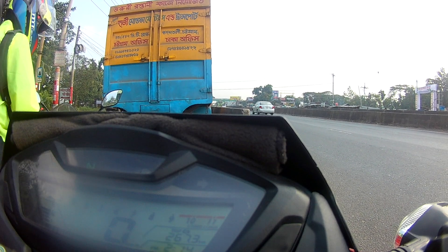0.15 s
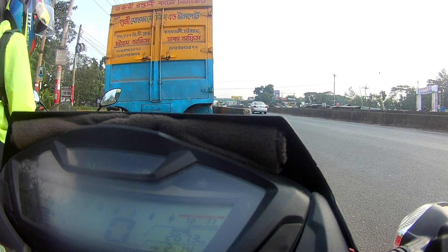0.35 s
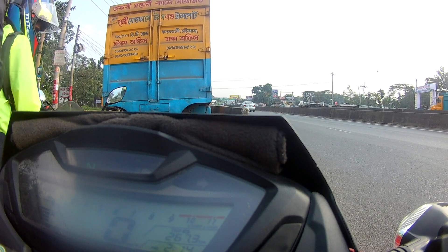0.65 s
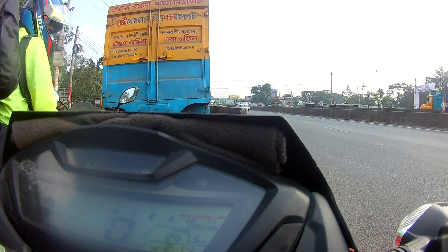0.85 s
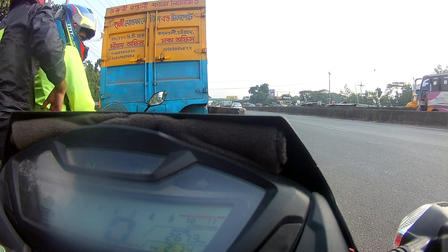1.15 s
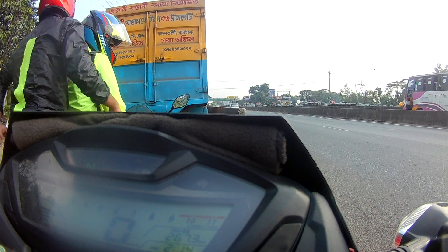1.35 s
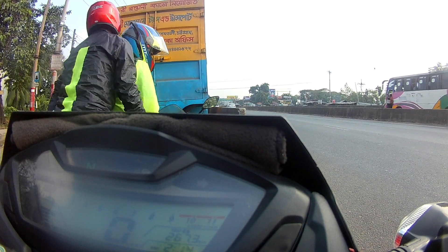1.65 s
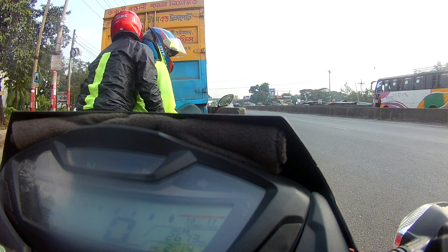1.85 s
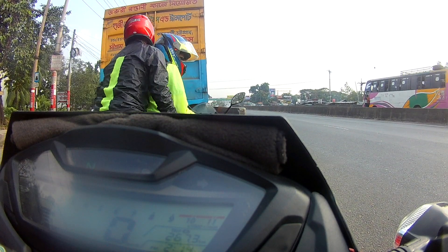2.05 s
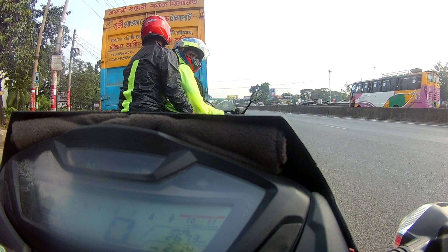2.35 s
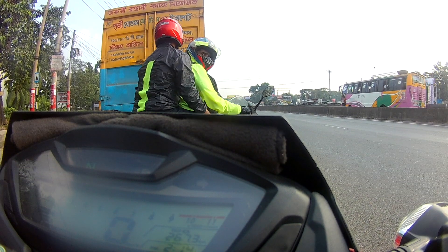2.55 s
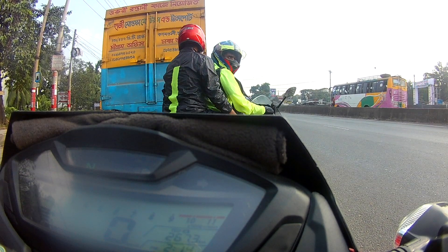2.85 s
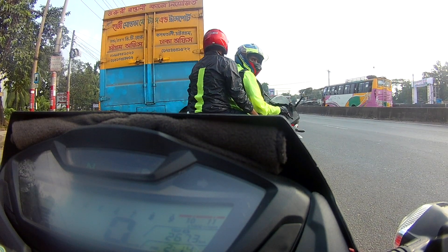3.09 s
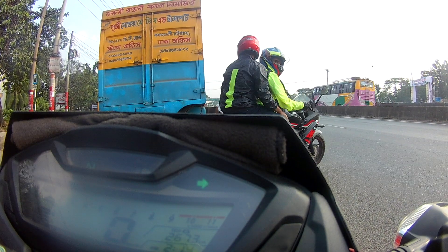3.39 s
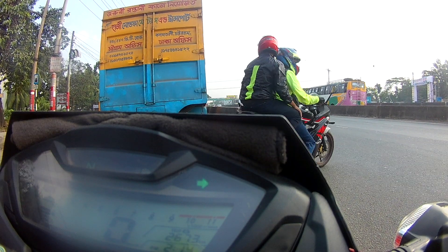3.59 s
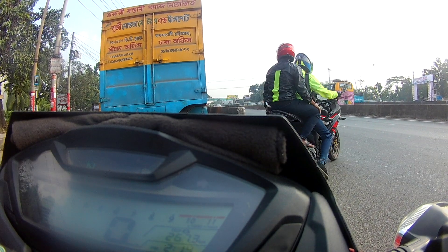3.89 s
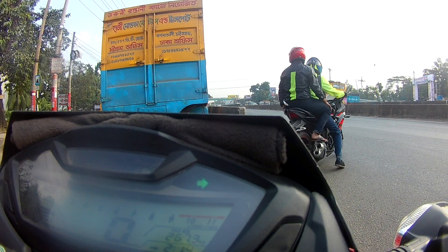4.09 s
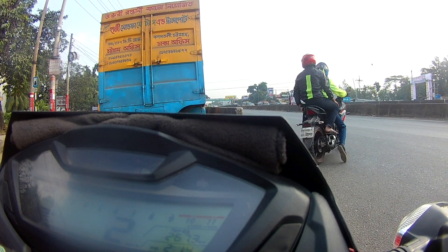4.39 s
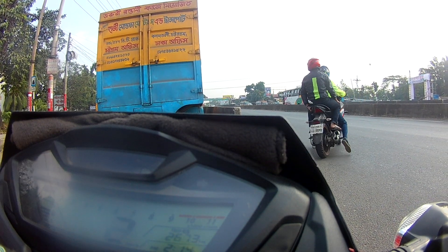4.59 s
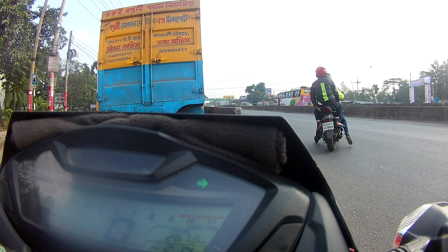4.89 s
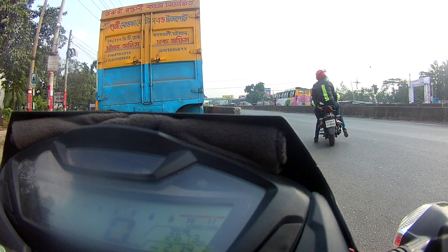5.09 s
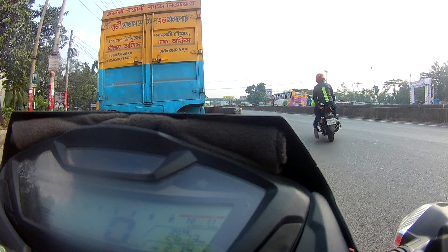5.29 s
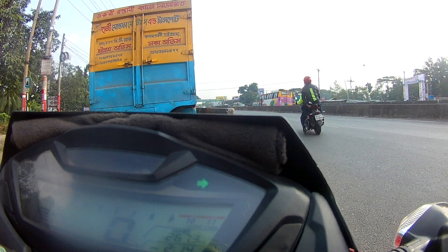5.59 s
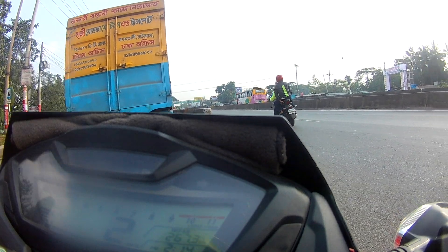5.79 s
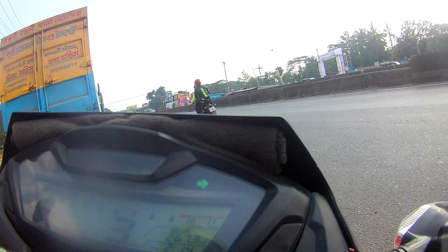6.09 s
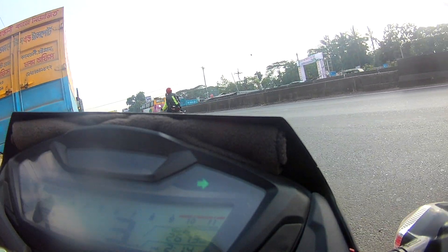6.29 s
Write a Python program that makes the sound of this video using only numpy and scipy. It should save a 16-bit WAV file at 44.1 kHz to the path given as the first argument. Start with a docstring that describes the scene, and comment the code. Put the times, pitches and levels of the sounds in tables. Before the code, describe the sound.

A microphone mounted on the motorcycle hears a clattery, puttering idle for about five seconds, with occasional harder piston slaps. Outdoors by a highway, steady traffic noise sits behind, with a deep passing drone at the start. Light control clicks precede a gear clunk; shortly after, the engine quickly speeds up, louder and firmer, with whining gears, low shaking and more air buffeting.

```python
"""A single-cylinder four-stroke motorcycle engine idles, first gear clunks in, then the revs climb and it pulls away.
One running cycle count places every knock, valve tick and exhaust puff; filters ring them through metal and pipe.
Under load the knocks close up to a growl, gear teeth whine as sine lines and a low shake fades in.
Behind it, filtered noise hums as highway traffic, a heavy vehicle drones by in harmonics and low air buffets."""
import sys
import numpy as np
from scipy import signal
from scipy.fft import rfft, irfft, next_fast_len
from scipy.io import wavfile
from scipy.ndimage import uniform_filter1d, map_coordinates

SR = 44100
rng = np.random.default_rng(int(sys.argv[2]) if len(sys.argv) > 2 else 0)


def write(x):
    x = np.atleast_2d(x).T
    wavfile.write(sys.argv[1], SR, np.round(np.clip(x, -1, 1) * 32767).astype(np.int16))


N = 284004

# engine speed: start_s [s], cycle_rate_hz [engine cycles per s]
ENGINE_SPEED = [(0.0, 10.45), (0.25, 11.08), (0.36, 10.76), (1.22, 10.91), (1.34, 11.51), (1.7, 10.93),
                (2.11, 11.22), (2.24, 10.65), (2.96, 11.24), (3.34, 10.63), (3.73, 11.22), (4.28, 10.42),
                (4.77, 11.05), (4.98, 14.91), (5.21, 24.63), (5.38, 28.19), (6.44, 21.47)]
# mechanical blows in one cycle: share [of a cycle after firing], knock_db, tick_db [dB, relative]
CONTACT_BLOWS = [(-.19, -8, -3), (-.12, -6, -3), (-.06, 0, 2), (-.02, -3, 0), (.05, -8, -4), (.17, -5, -6),
                 (.25, -3.5, -12), (.33, -4, -6), (.43, -6, -4), (.5, -7, -5), (.63, -6, -2)]
# pressure waves in the pipe: share [of a cycle after firing], idle_db, load_db [dB, relative]
EXHAUST_PUFFS = [(-.04, 0, -9), (0.08, -4, 5), (0.303, -8, -7), (0.451, -1.5, -12)]
# whine lines: multiple [of the cycle rate], level_db [dB, relative, before the cover]
GEAR_TEETH = [(25, -2.5), (26, -13.5), (39, -8.5), (40, 0), (43, -7.5), (44, 0.5), (45, 4), (46, -2.5)]
# hardest piston slaps: start_s [s], level_db [dB; the largest sets the peak of the whole layer]
PISTON_SLAPS = [(0.181, -14), (0.271, -15.5), (0.366, -12.5), (0.458, -15), (0.923, -18), (1.194, -15.5),
                (1.643, -15.5), (1.826, -13.5), (2.556, -15.5), (2.918, -18), (3.054, -14.5),
                (4.162, -10.5), (4.472, -15), (5.046, -8)]
# lever and gearbox clicks: start_s [s], level_db [dB, before the lever's ring]
LEVER_CLICKS = [(2.649, -34.5), (3.058, -28), (4.162, -31.5), (4.411, -37)]
# first gear's dogs knock home and rebound: start_s [s], level_db [dB, before the frame's ring]
GEAR_KNOCKS = [(4.167, -13), (4.178, -5)]
# crankcase hum, swelling and sinking: start_s [s], level_db [dB, before the hum offsets]
CASE_HUM = [(0, -30.5), (0.8, -32.5), (1.55, -29.5), (2.1, -31.5), (3.5, -31), (3.9, -34.5), (4.7, -30),
            (5.5, -28.5), (6.2, -37), (6.44, -30)]
# passing heavy vehicle: start_s [s], pitch_hz [Hz, missing fundamental], level_db [dB rms]
PASSING_VEHICLE = [(0, 28, -44.5), (.45, 18.6, -49.5), (1.2, 15.4, -53), (2.4, 12, -83.5)]
# buffeting air: start_s [s], level_db [dB rms]
AIR_BUFFET = [(0, -59), (3.9, -57.5), (5.1, -51)]

# Resonance curves, all: pitch_hz [Hz], level_db [dB, filter gain]
# block, idling and under load
BLOCK_RING = [(300, -44.5), (600, -23), (850, -5.5), (1000, -8), (1170, 6.5), (1280, 2.5), (1420, 0),
              (1600, -16), (1850, -12.5), (2130, -36.5), (2600, -49), (6000, -94.5)]
BLOCK_LOAD_RING = [(300, -42), (600, -19.5), (800, -11.5), (920, -3.5), (1040, -1), (1170, -12),
                   (1300, -4.5), (1450, 3.5), (1620, -5), (1850, -18.5), (2130, -23), (2600, -39.5),
                   (6000, -100.5)]
# crankcase, cylinder head and chain mesh
CASE_RING = [(350, -58.5), (480, -26.5), (570, -12), (630, -2.5), (700, 4), (728, -3.5), (760, -19.5),
             (1000, -55.5), (2000, -80)]
VALVE_RING = [(1500, -37.5), (2130, -28), (2350, -2.5), (2560, -25.5), (2720, 4), (2870, -3.5), (3020, 4.5),
              (3150, -14), (3300, -38.5), (5000, -63.5)]
MESH_RING = [(2600, -18), (3300, -9.5), (3650, 1.5), (3850, -6.5), (4150, 5), (4500, -9), (5000, -27.5),
             (5600, -14), (6100, -34), (7100, -32), (7800, -43), (12000, -60)]
# thin metallic rasp at high revs
SIZZLE_RING = [(4000, -27), (5100, -6), (5600, -3.5), (6100, -4.5), (7100, -3.5), (7500, -13),
               (7900, -18.5), (12000, -44)]
# exhaust pipe, idling and under load
PIPE_RING = [(60, -44), (125, -28), (165, -4), (192, -23.5), (225, -1), (260, -19), (303, 5.5), (340, -1.5),
             (390, -14), (450, -33.5), (600, -44.5), (1200, -76)]
PIPE_LOAD_RING = [(60, -46), (130, -19.5), (168, 2.5), (195, -9.5), (222, 8), (258, -8.5), (300, 7),
                  (335, 2), (390, -16), (450, -28.5), (600, -22.5), (1200, -84)]
# gear cover, which lets the whine out
COVER_RING = [(480, -33), (600, -7.5), (685, 6), (760, -20.5), (920, -13.5), (1060, -4), (1170, 2),
              (1300, -6), (2000, -38)]
# bore struck by the piston, control lever, frame
BORE_RING = [(400, -45), (850, -11.5), (1030, -8), (1160, -1.5), (1300, -0.5), (1550, -12.5), (2100, -34.5),
             (2800, -24.5), (3400, -47), (6000, -65.5), (10000, -105)]
LEVER_RING = [(900, 8), (1500, 6.5), (3000, 11.5), (4200, -8.5), (5300, -15), (6700, -23), (8000, -44),
              (12000, -86)]
FRAME_RING = [(60, -15), (130, -7), (178, 4.5), (300, -11), (500, -20.5), (900, -3), (2000, -49.5),
              (5000, -88)]
# colour of the traffic and of the air
TRAFFIC_COLOUR = [(15, -14), (40, -2), (75, -8.5), (120, -5), (300, -2), (460, -9.5), (900, -5),
                  (1500, 6.5), (2200, -30), (4500, -44.5), (8000, -54.5), (15000, -56)]
AIR_COLOUR = [(10, -15), (26, 10.5), (40, -11.5), (80, -39.5), (300, -74)]

# Loudness laws, all: idle_db [dB at the reference idle], doubling_db [dB per doubling of speed]
EXHAUST_LAW = (-39.5, 8.94)
KNOCK_LAW = (-32.5, 6.86)
VALVE_LAW = (-46, 3.4)
MESH_LAW = (-62.5, 8.85)
CRANK_LAW = (-45, 9.7)
FIRING_LAW = (-52.5, 6.8)
WHINE_LAW = (-44, 11.1)

IDLE_RATE_HZ = 11  # engine cycles per s, reference for the loudness laws
HUM_OFFSET_DB, HUM_LOAD_DB = 0.5, 1.5  # fixed offset, change per unit of load
# firing knock against the block's ring, and its rise per doubling of speed a second
LABOUR_DB, LABOUR_RISE_DB = -11, 1.5
BURBLE_SHARE = 0.98  # steady burble under the idle puffs
SHAKE_FROM_S, SHAKE_FULL_S = 5.0, 5.06
GRAB_S, GRAB_WIDTH_S, GRAB_DB = 5.305, 0.014, 5
REBOUND_S, REBOUND_DB = .0042, -6  # delay and level of the piston's bounce
TOP_HZ = 15700


def clatter(cycle):
    """Piston, chain and valves strike in turn and ring the block, crankcase and cylinder head."""
    load = throttle()
    knocks = sum(amp(knock_db) * rattle(strokes(cycle, share, scatter_db=1.7), t60=0.043, rough=0.7)
                 for share, knock_db, _ in CONTACT_BLOWS)
    ticks = sum(amp(tick_db) * rattle(strokes(cycle, share, scatter_db=1.4), t60=.024, rough=.45)
                for share, _, tick_db in CONTACT_BLOWS)
    churn = even_round(cycle, t60=0.12, rough=0.5)
    # load presses the parts together: knocks even out to a growl and the firing itself cracks
    growl = unit(knocks) + 2.1 * even_round(cycle, t60=0.012, rough=0.26)
    crack = rattle(strokes(cycle, -.09, scatter_db=1.0), t60=.034, rough=.45)
    head = np.sqrt(1 - .5 * load) * unit(ticks) + np.sqrt(.5 * load) * unit(crack)

    idling = np.sqrt(1 - .85 * load) * unit(body(knocks, BLOCK_RING))
    pulling = amp(-1.0) * np.sqrt(load) * unit(body(growl, BLOCK_LOAD_RING))
    # firing knocks come forward while the engine gains speed
    labour = amp(LABOUR_DB + LABOUR_RISE_DB * pickup())
    labouring = labour * unit(body(crack, BLOCK_RING))
    block_mix = (idling + pulling + labouring) / np.sqrt(1 + labour ** 2)
    block = amp(level(KNOCK_LAW)) * block_mix

    # at idle the crank slows against compression, so the case hum dips around each firing
    stall_db = -3.5 * (1 - load) * np.cos(np.pi * cycle) ** 16
    hum_db = curves(CASE_HUM)[0] + HUM_OFFSET_DB + HUM_LOAD_DB * load + stall_db
    case = amp(hum_db) * unit(body(churn, CASE_RING))
    valves = amp(level(VALVE_LAW)) * unit(body(head, VALVE_RING))
    mesh = amp(level(MESH_LAW)) * unit(body(head + 0.93 * churn, MESH_RING))
    rasp = head * amp(2.5 * wobble(20))
    sizzle = amp(-78) * load * unit(body(rasp, SIZZLE_RING))
    return block + case + valves + mesh + sizzle


def exhaust(cycle):
    """Puffs ring the pipe: soft and gassy over a steady burble at idle, firm and clean under load."""
    load = throttle()
    soft = sum(amp(idle_db) * rattle(strokes(cycle, share, scatter_db=0.8), t60=0.086, rough=0.44)
               for share, idle_db, _ in EXHAUST_PUFFS)
    burble = even_round(cycle, t60=0.09, rough=0.27)
    firm = sum(amp(load_db) * strokes(cycle, share, scatter_db=2.0) for share, _, load_db in EXHAUST_PUFFS)
    idling = np.sqrt(1.1 - load) * unit(body(unit(soft) + BURBLE_SHARE * burble, PIPE_RING))
    pulling = np.sqrt(load) * unit(body(firm, PIPE_LOAD_RING))
    return amp(level(EXHAUST_LAW)) * (idling + pulling)


def whine(cycle):
    """Loaded gear teeth sing on high multiples of the cycle rate, sliding through the cover's resonances."""
    lines = 0
    for multiple, level_db in GEAR_TEETH:
        phase = 2 * np.pi * multiple * cycle + 1.2 * wobble(28)
        lines = lines + amp(level_db + 5.2 * wobble(14)) * np.sin(phase)
    return amp(level(WHINE_LAW)) * throttle() * body(lines, COVER_RING)


def drone(cycle):
    """The frame shakes four times per cycle with the piston, and once with each firing."""
    crank = amp(level(CRANK_LAW)) * np.sin(8 * np.pi * cycle)
    firing = amp(level(FIRING_LAW) + 3.5 * wobble(3.9)) * np.sin(2 * np.pi * cycle)
    fade_in = curves([(SHAKE_FROM_S, 0), (SHAKE_FULL_S, 1)])[0]
    return fade_in * (crank + firing)


def slaps():
    """At listed moments the piston slaps hard against the bore and rebounds, ringing it."""
    hits = np.zeros(N)
    for start_s, level_db in PISTON_SLAPS:
        hits[round(start_s * SR)] = amp(level_db)
        hits[round((start_s + REBOUND_S) * SR)] += amp(level_db + REBOUND_DB)
    ring = body(hits, BORE_RING)
    return ring * hits.max() / np.abs(ring).max()


def gearbox():
    """Short noise bursts click the levers; longer ones shudder through the frame as the gear engages."""
    clicks = sum(amp(level_db) * burst(start_s, t60=0.025) for start_s, level_db in LEVER_CLICKS)
    thump = sum(amp(level_db) * burst(start_s, t60=0.16) for start_s, level_db in GEAR_KNOCKS)
    return body(clicks, LEVER_RING) + body(thump, FRAME_RING)


def traffic():
    """Highway hum: steady filtered noise."""
    return amp(-36.0) * unit(body(noise(), TRAFFIC_COLOUR))


def passing_vehicle():
    """A heavy vehicle goes by: harmonics 4 to 9 of a falling pitch fade away."""
    pitch_hz, level_db = curves(PASSING_VEHICLE)
    turn = 2 * np.pi * np.cumsum(pitch_hz) / SR
    harmonics = sum(k * np.sin(k * turn + 0.37 * wobble(3.3) + rng.uniform(0, 2 * np.pi))
                    for k in range(4, 10))
    return amp(level_db) * unit(harmonics)


def buffeting():
    """Moving air: low filtered noise that grows towards the pull-away."""
    return amp(curves(AIR_BUFFET)[0]) * unit(body(noise(), AIR_COLOUR))


def revs():
    """Engine speed in doublings above the reference idle."""
    return np.log2(curves(ENGINE_SPEED)[0] / IDLE_RATE_HZ)


def throttle():
    """Engine load: almost 0 at idle, rising to 0.71 for the pull-away."""
    return curves([(4.95, 0.0097), (5.27, 0.71)])[0]


def pickup():
    """How fast the engine gains speed, in doublings a second, smoothed over 0.1 s."""
    return np.maximum(uniform_filter1d(np.gradient(revs()) * SR, size=SR // 10), 0)


def grab():
    """Gain of the brief swell as the clutch takes hold and the engine shudders."""
    from_grab = (np.arange(N) / SR - GRAB_S) / GRAB_WIDTH_S
    return amp(GRAB_DB * np.exp(-from_grab ** 2))


def level(law):
    """A part's loudness in dB, following the engine's speed."""
    idle_db, doubling_db = law
    return idle_db + doubling_db * revs()


def strokes(cycle, share, scatter_db):
    """One impulse per cycle at the given share of it; mean power stays even at any speed."""
    at = np.interp(np.arange(-1, cycle[-1] + 1) + share, cycle, np.arange(N), left=-1, right=-1)
    at = np.round(at[at >= 0]).astype(int)
    size = amp(scatter_db * rng.standard_normal(len(at))) / np.sqrt(np.gradient(cycle)[at])
    return np.bincount(at, size, N)


def rattle(hits, t60, rough):
    """Each hit sets off the same short rattle through the metal, plus a rough share new each time."""
    t = np.arange(SR // 10) / SR
    fade = amp(-60 * t / t60) * (1 - np.exp(-t / .0015))
    pattern = fade * rng.standard_normal(len(fade))
    alike = signal.oaconvolve(hits, pattern)[:N]
    power = np.abs(signal.oaconvolve(hits ** 2, fade ** 2)[:N])
    fresh = np.sqrt(power) * noise()
    return np.sqrt(1 - rough) * alike + np.sqrt(rough) * fresh


def even_round(cycle, t60, rough, count=8):
    """Chain links and rollers: evenly spaced small blows all round the cycle."""
    return unit(sum(rattle(strokes(cycle, k / count, scatter_db=1.0), t60, rough) for k in range(count)))


def burst(start_s, t60):
    """Noise that starts at start_s and dies away by 60 dB in t60 seconds."""
    t = np.arange(N) / SR - start_s
    return (t >= 0) * amp(-60 * np.abs(t) / t60) * noise()


def body(x, spectrum):
    """Ring x through a causal minimum-phase filter with the given resonance curve."""
    m = next_fast_len(N + SR // 2, real=True)
    pitch_hz, level_db = np.transpose(spectrum)
    log_bins = np.log(np.fft.rfftfreq(m, 1 / SR) + 1)
    gain = amp(np.interp(log_bins, np.log(pitch_hz), level_db))
    # folding the cepstrum onto positive time puts the ring after the hit
    cepstrum = irfft(np.log(gain), m)
    cepstrum[1:m // 2] *= 2
    cepstrum[m // 2 + 1:] = 0
    return irfft(rfft(x, m) * np.exp(rfft(cepstrum)), m)[:N]


def wobble(rate):
    """A smooth random curve with rate knots a second."""
    knots = rng.standard_normal(int(N * rate / SR) + 4)
    return map_coordinates(knots, [np.arange(N) * rate / SR])


def noise():
    """Fresh white noise."""
    return rng.standard_normal(N)


def curves(rows):
    """One value per sample for each column after the time."""
    start_s, *columns = np.transpose(rows)
    return [np.interp(np.arange(N) / SR, start_s, column) for column in columns]


def amp(db):
    """Decibels to gain."""
    return 10 ** (np.asarray(db) / 20)


def unit(x):
    """Scale to rms 1."""
    return x / np.sqrt(np.mean(x ** 2) + 1e-20)


def scene():
    """One cycle count drives all the engine's running parts; gearbox and roadside join the mix."""
    cycle = np.cumsum(curves(ENGINE_SPEED)[0]) / SR
    running = grab() * (clatter(cycle) + exhaust(cycle) + whine(cycle))
    engine = running + drone(cycle) + slaps()
    roadside = traffic() + passing_vehicle() + buffeting()
    return (engine + gearbox() + roadside)[None]


def record(dry):
    """Cut everything above the band limit."""
    m = next_fast_len(N + SR // 2)
    passband = np.fft.rfftfreq(m, 1 / SR) < TOP_HZ
    return irfft(rfft(dry, m) * passband, m)[:, :N]


dry = scene()
out = record(dry)
write(out)
```